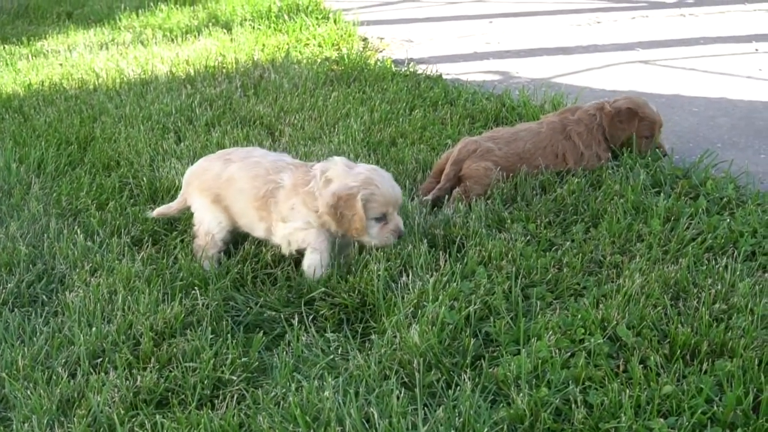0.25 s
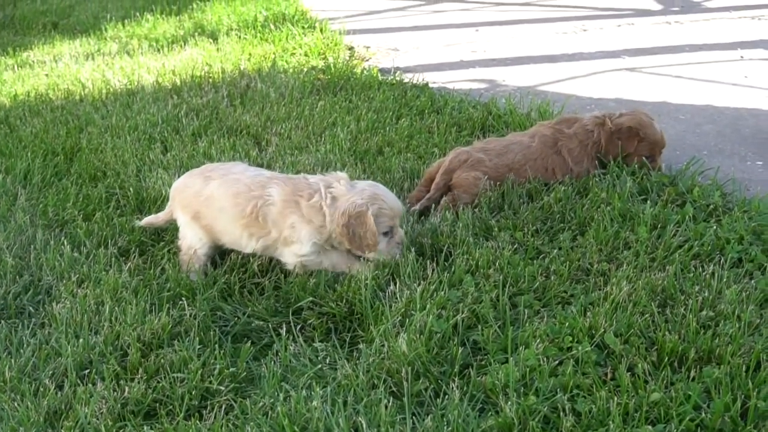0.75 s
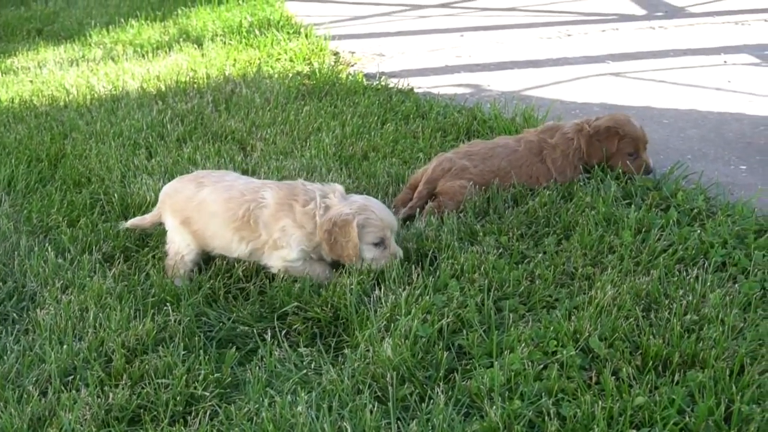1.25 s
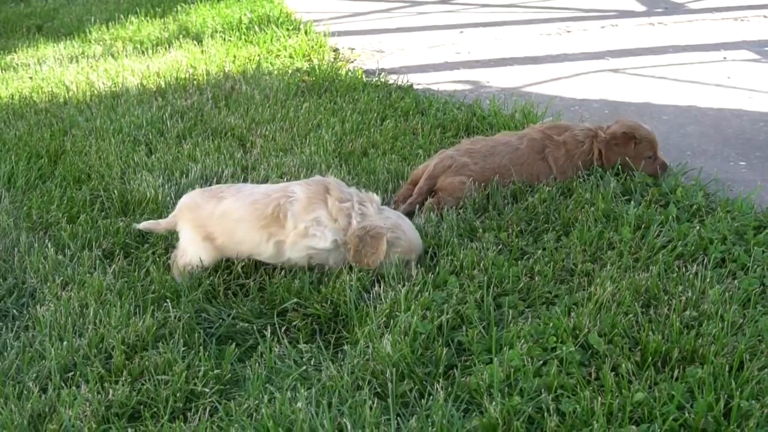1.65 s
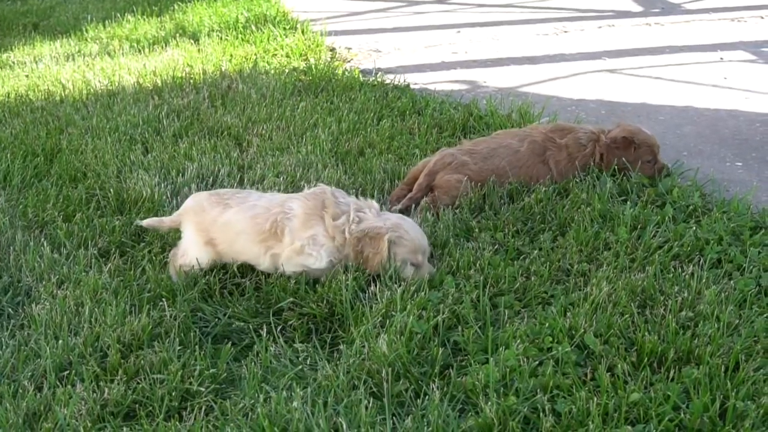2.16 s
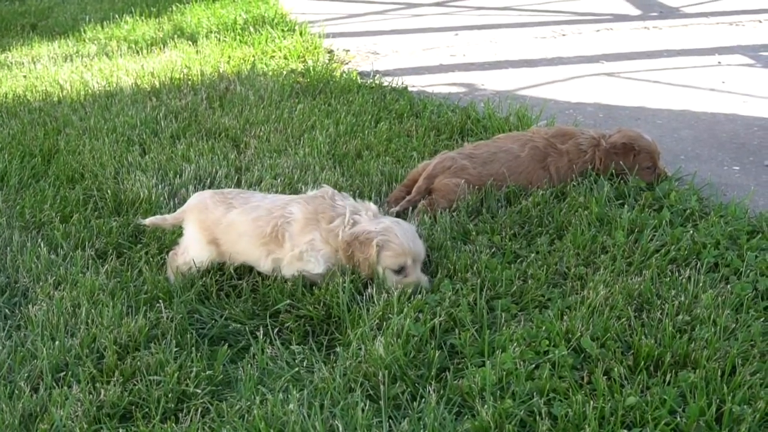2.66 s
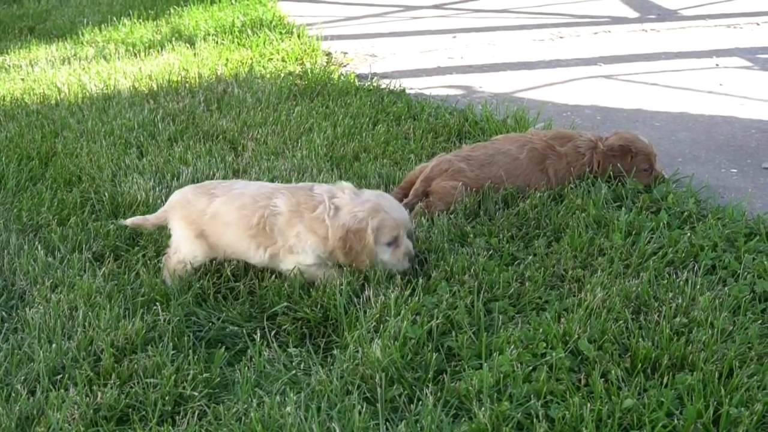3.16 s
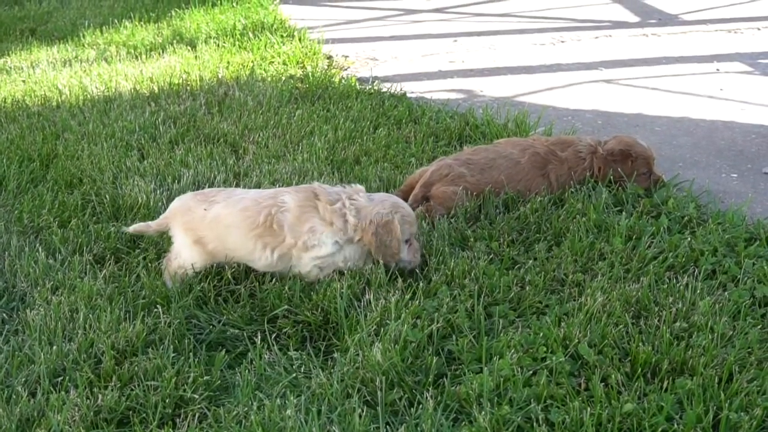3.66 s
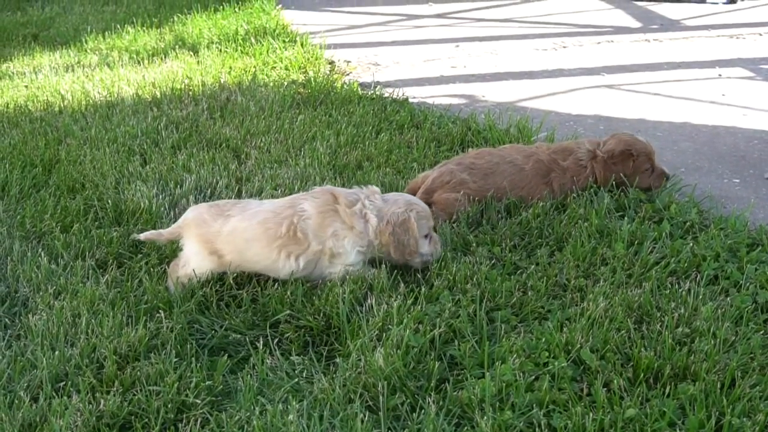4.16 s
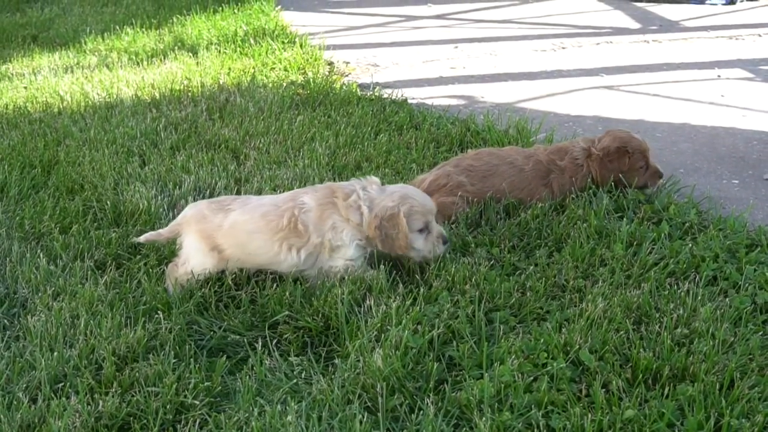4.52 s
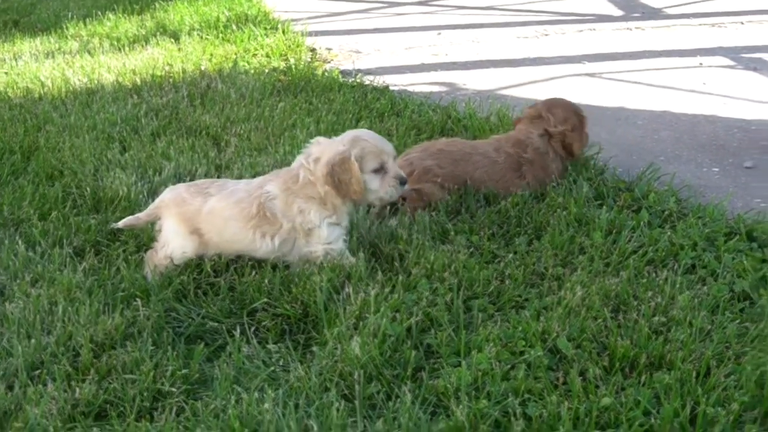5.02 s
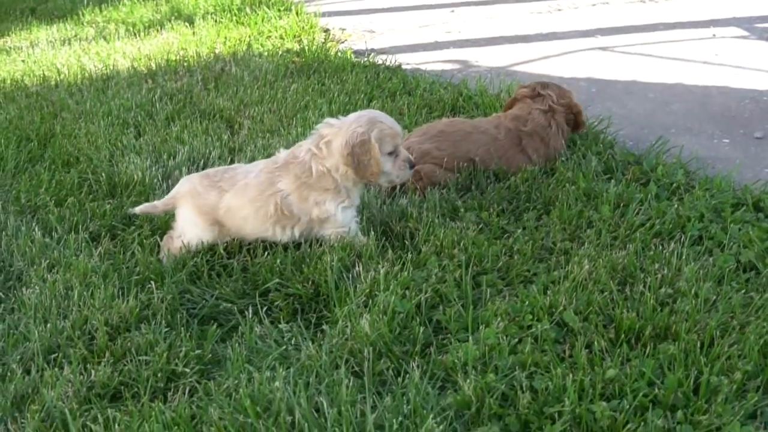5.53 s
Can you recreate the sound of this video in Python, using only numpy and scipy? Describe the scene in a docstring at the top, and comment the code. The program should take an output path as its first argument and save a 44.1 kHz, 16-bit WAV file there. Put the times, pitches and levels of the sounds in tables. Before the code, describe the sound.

A nearby sparrow gives three sharp falling chirps on the left while wind buffets the microphone early on and distant birds twitter.

```python
"""Sparrow in a summer garden

A near sparrow, mostly to the left, gives three two-humped falling chirps: a voice whose pitch and loudness
follow syrinx tension, reflected by ground, walls and foliage. Other birds cheep and whistle further off as
gliding tones. Shaped noise makes the gusts, strongest in the first three seconds, the ticks in the grass
and the faint neighbourhood air and hum. A limiter ducks everything at loud peaks and recovers slowly."""
import sys
import numpy as np
from scipy import signal
from scipy.fft import rfft, irfft
from scipy.io import wavfile
from scipy.ndimage import uniform_filter1d, minimum_filter1d

SR = 44100
rng = np.random.default_rng(int(sys.argv[2]) if len(sys.argv) > 2 else 0)


def store_wav(level_fs):
    """Save 16-bit WAV to argv[1]."""
    pcm = np.round(np.clip(np.atleast_2d(level_fs), -1, 1) * 32767)
    wavfile.write(sys.argv[1], SR, pcm.T.astype(np.int16))


N = 255206
TIME = np.arange(N) / SR
FREQ = np.maximum(np.fft.rfftfreq(N, 1 / SR), 1)


def undb(db):
    """Amplitude ratio: 20 dB is a factor of ten."""
    return 10 ** (np.asarray(db) / 20)


def unit(x):
    """Power normalisation: scale to rms 1."""
    return x / np.sqrt(np.mean(x ** 2))


def follow(table, t):
    """Linear interpolation: the columns of a time curve at times t."""
    s, *columns = np.transpose(table)
    return [np.interp(t, s, c) for c in columns]


def across(points):
    """Logarithmic interpolation: a curve over frequency, joined on a log axis."""
    hz, value = np.transpose(points)
    return np.interp(np.log(FREQ), np.log(np.maximum(hz, 1)), value)


def band(x, lo_hz, hi_hz, order=2):
    """Band-pass filtering: a Butterworth resonance between two edges."""
    edges_hz = [lo_hz, min(hi_hz, .45 * SR)]
    return signal.sosfilt(signal.butter(order, edges_hz, "band", fs=SR, output="sos"), x)


def walk(rate, size=N):
    """Random modulation: held random values, smoothed into a wander."""
    hold = max(int(SR / rate), 1)
    steps = np.repeat(rng.standard_normal(size // hold + 1), hold)
    return uniform_filter1d(steps, hold)[:size]


def add(track, start, sound):
    """Superposition: mix a sound into a track at a time in seconds."""
    i = max(int(start * SR), 0)
    track[..., i:i + sound.shape[-1]] += sound[..., :max(N - i, 0)]


def scatter(x, t60, onset):
    """Diffuse reverberation: leaves, fences and walls return a dense tail, different in each ear."""
    t = np.arange(SR) / SR
    decay = np.exp(-np.log(1000) * t / t60)
    tail = rng.standard_normal((2, SR)) * decay * (1 - np.exp(-t / onset))
    tail /= np.sqrt(np.sum(tail ** 2, axis=1, keepdims=True))
    return signal.fftconvolve(x[None], tail, axes=1)[:, :N]


def echoes(x, walls):
    """Specular reflection: flat surfaces return delayed copies."""
    out = np.zeros((2, N))
    for delay, left_db, right_db in walls:
        add(out, delay, undb([[left_db], [right_db]]) * x)
    return out


# spectrum of the background air: pitch_hz [Hz], relative_level_db [dB]
AIR_SPECTRUM = [(15, -36), (25, 2), (140, -2), (193, -6), (246, -2.5), (389, -11.5), (457, -10.5),
                (567, -16), (848, -17), (2560, -23.5), (4150, -18.5), (5140, -18.5), (6380, -32.5),
                (9050, -38), (15500, -42)]
# stereo width of the air: pitch_hz [Hz], side_minus_mid_db [dB]
AIR_WIDTH = [(60, -28), (110, -34), (200, -31), (380, -13), (700, -7.5), (1290, -5), (2380, -4.5),
             (4400, -8.5), (8120, 0), (15000, -3)]
# distant machine hum: pitch_hz [Hz], width_hz [Hz], level_db [dB]
HUM_LINES = [(143.9, 5.7, -47), (241.1, 9.1, -54.5)]


def neighbourhood(air_db=-53, flicker_db=1.08, dip_hz=4200, dip_db=-3):
    """Coloured noise: distant traffic and leaves, alike in both ears in the bass, over narrow-band hum."""
    dip = dip_db * np.exp(-np.log2(FREQ / dip_hz) ** 2 / 0.3)
    colour = undb(across(AIR_SPECTRUM) + dip)
    mid, side = rfft(rng.standard_normal((2, N))) * colour
    mid, side = irfft(mid, N), irfft(side * undb(across(AIR_WIDTH)), N)
    # air_db is the mean level of the mid signal between 700 and 1800 Hz
    air = (mid + np.array([[1], [-1]]) * side) / np.std(band(mid, 700, 1800, order=4))
    hum = np.zeros(N)
    for hz, width, line_db in HUM_LINES:
        hum += undb(line_db) * unit(band(rng.standard_normal(N), hz - width / 2, hz + width / 2))
    return air * undb(air_db + flicker_db * walk(8)) + hum


# ticks and rustles of the grass: start_s [s], onset_level_db [dB], centre_hz [Hz], decay_s [s]
GRASS_TICKS = [(.887, -31, 2800, .005), (1.36, -45, 1700, .03), (5.292, -45, 1820, .027),
               (5.312, -39, 9135, .01), (5.316, -39, 1700, .012)]


def grass():
    """Impulsive excitation: dry blades and twigs give band-limited noise that dies exponentially."""
    out = np.zeros((2, N))
    for start, db, hz, decay in GRASS_TICKS:
        t = np.arange(int(4 * decay * SR)) / SR
        # one part common to both ears, one part separate
        noise = rng.standard_normal(len(t)) + 0.67 * rng.standard_normal((2, len(t)))
        tick = unit(band(noise, hz / 1.36, hz * 1.35))
        add(out, start, undb(db) * tick * np.exp(-t / decay))
    return out


# breeze between gusts: time_s [s], relative_level_db [dB]
BREEZE = [(0, -33), (.55, -35), (1.1, -37.5), (1.35, -28.5), (1.8, -28), (2.7, -33), (3.2, -50.5),
          (5.0, -48.5), (5.79, -34.5)]
# bell-shaped gusts: peak_s [s], length_s between the 1/e points of power [s], relative_level_db [dB]
GUSTS = [(0.102, 0.057, -22.5), (0.228, 0.13, -20), (0.695, 0.044, -27), (0.788, 0.021, -26.5),
         (0.956, 0.13, -30), (1.183, 0.038, -24.5), (1.253, 0.024, -28.5), (1.415, 0.07, -19),
         (1.478, 0.073, -13.5), (1.612, 0.063, -14.5), (1.724, 0.058, -15.5), (1.891, 0.049, -13.5),
         (2.017, 0.085, -16), (2.24, 0.054, -19), (2.304, 0.049, -22.5), (2.379, 0.049, -17.5),
         (2.468, .045, -23), (2.55, .06, -24), (2.847, 0.03, -20), (2.914, 0.072, -18.5),
         (3.049, .04, -35.5), (4.05, 0.026, -30), (4.514, 0.045, -32.5), (5.595, .1, -26)]


def wind_level():
    """Power addition: level in dB of the flow at the microphone, gusts on top of the breeze."""
    breeze_db, = follow(BREEZE, TIME)
    gust_power = np.zeros(N)
    for peak, length, db in GUSTS:
        bell = np.exp(-np.minimum((2 * (TIME - peak) / length) ** 2, 20))
        gust_power += undb(db) ** 2 * bell
    return 10 * np.log10(undb(breeze_db) ** 2 + gust_power)


# spectrum of the wind noise: pitch_hz [Hz], relative_level_db [dB]
WIND_SPECTRUM = [(12, -43), (20, -19), (59, 0), (113, 1), (143, -2.5), (173, -9), (232, -6.5), (332, -13),
                 (387, -25), (444, -19.5), (648, -39), (1200, -68), (1560, -77), (2640, -120)]
# phase between the ports: pitch_hz [Hz], left_lead_rad [rad]
WIND_PHASE = [(30, .1), (55, .3), (100, .65), (165, 1.05), (250, 1.45), (400, 1.8), (650, 1.9)]
# sharp buffets: start_s [s], relative_level_db [dB], nominal_pitch_hz [Hz], nominal_length_s [s]
BUFFETS = [(.055, -29, 296.6, 0.026), (.970, -22.5, 251, 0.0157), (1.162, -21, 269, .02),
           (1.43, -14, 307, .044), (1.675, -2.5, 258.4, 0.011), (1.714, -13.5, 240, .017),
           (1.901, -10.5, 298, .0115), (2.033, -17.5, 266, 0.031), (2.365, -19, 262, 0.02),
           (2.874, -10.5, 233, 0.024)]
STRONG_DB, REACH = -15, 0.45  # above this wind level [dB] the upper band gains REACH dB more per dB


def wind(gust_db=0.5, upper_db=-12.0, calm_db=-43, apart_db=-12, split_hz=250, buffet_db=-6):
    """Turbulent pressure: eddies buffet the microphone ports; stronger gusts reach higher in frequency."""
    db = wind_level()
    upper_rel_db = REACH * (db - STRONG_DB)
    colour = undb(across(WIND_SPECTRUM))
    upper_share = 1 / (1 + (split_hz / FREQ) ** 6)
    bands = [(1 - upper_share, db + gust_db), (upper_share, db + upper_rel_db + upper_db)]
    pressure = np.zeros(N)
    for share, band_db in bands:
        eddies = irfft(rfft(rng.standard_normal(N)) * colour * share, N)
        # the flow is even within a gust: its strength comes from the gust alone
        eddies /= np.sqrt(uniform_filter1d(eddies ** 2, int(0.0573 * SR)))
        pressure += eddies * undb(band_db)
    # a flow weaker than calm_db is softened further
    pressure /= np.sqrt(1 + undb(calm_db - db) ** 2)
    for start, peak_db, hz, length in BUFFETS:
        size = int(1.6 * length * SR)
        eddy = band(rng.standard_normal(SR // 4), hz / 1.62, hz * 1.05)[-size:]
        eddy = unit(eddy * signal.windows.tukey(size, .6))
        add(pressure, start, undb(peak_db + buffet_db) * eddy)
    # the two ports feel the same eddy out of step, plus a little of their own
    turn = np.exp(np.array([[.5j], [-.5j]]) * across(WIND_PHASE))
    own = unit(irfft(rfft(rng.standard_normal((2, N))) * colour, N))
    return irfft(rfft(pressure) * turn, N) + own * undb(db + apart_db)


# resonances of a distant bird's open beak: centre_hz [Hz], width_hz [Hz], relative_level_db [dB]
BEAK = [(9310, 540, -1.5), (13510, 1900, -10)]


def cheep(length, first_hz, last_hz, octave_db, bend=3.2, waver=0.02534, hoarse=0.085, buzz_hz=170,
          overtone_db=-2):
    """Frequency modulation: a glide that levels off; a harsh one buzzes in pitch and hisses in the beak."""
    u = np.linspace(0, 1, int(length * SR))
    size = len(u)
    fall = (np.exp(-bend * u) - np.exp(-bend)) / (1 - np.exp(-bend))
    buzz_rate = buzz_hz * (1 + 0.282 * walk(79.96, size))
    buzz = np.sin(2 * np.pi * np.cumsum(buzz_rate) / SR) + 0.556 * walk(1200, size)
    wobble = waver * walk(109.98, size) + hoarse * undb(octave_db / 2) * buzz
    hz = (last_hz + (first_hz - last_hz) * fall) * (1 + wobble)
    phase = 2 * np.pi * np.cumsum(hz) / SR
    hiss = np.zeros(size)
    for centre, width, db in BEAK:
        noise = band(rng.standard_normal(size), centre - width / 2, centre + width / 2)
        hiss += undb(db - 5.5) * unit(noise)
    tone = np.sin(phase) + undb(octave_db) * (undb(overtone_db) * np.sin(2 * phase) + hiss)
    swell = signal.windows.tukey(size, .3)
    return np.sqrt(2) * swell * undb(1.1 * walk(64.0, size)) * tone


def flock(low_hz=3000, high_hz=5400, count=200):
    """Superposed sources: many faint short cheeps, spread over time, merge into diffuse twitter."""
    voice = np.zeros(N)
    for k, (when, pitch, size, span) in enumerate(rng.random((count, 4))):
        hz = low_hz + (high_hz - low_hz) * np.sqrt(pitch)
        call = cheep(0.02069 + 0.0405 * span, hz, 0.67 * hz, -48)
        start = (k + when) / count * N / SR - .1
        add(voice, start, undb(-50 + 4 * size) * call)
    return scatter(voice, t60=0.25, onset=0.0034)


# harsh cheeps of distant sparrows:
# start_s [s], length_s [s], last_pitch_hz [Hz], source_level_db [dB], relative_overtone_and_hiss_db [dB]
CHEEPS = [(1.020, .13, 4220, -38.5, -8), (1.303, 0.11, 4360, -33, -14), (1.748, 0.22, 4126, -33.5, -13.5),
          (2.059, .15, 4430, -35, -11.5), (2.173, 0.178, 4136, -41.5, -12.5),
          (2.593, 0.18, 4220, -37, -11.5), (2.764, 0.096, 4180, -39, -12.5), (2.942, .22, 4163, -41, -12.5),
          (3.443, 0.12, 4350, -37.5, -20), (3.742, .22, 4010, -39.5, -15.5), (4.652, 0.15, 4276, -40, -16),
          (5.008, 0.2, 4350, -39.5, -16), (5.435, 0.2, 4080, -43, -16.5), (5.692, .1, 4300, -47.5, -8)]
# short clear notes of other distant birds:
# start_s [s], length_s [s], first_pitch_hz [Hz], last_pitch_hz [Hz], source_level_db [dB]
NOTES = [(0.049, 0.18, 4300, 2980, -46.5), (0.718, .05, 2680, 2300, -44), (0.953, 0.078, 3500, 2726, -42),
         (1.153, 0.056, 3800, 2870, -40), (2.328, 0.042, 3400, 2747, -41.5),
         (2.376, 0.056, 6040, 4600, -40), (2.587, 0.056, 3400, 2950, -38), (2.795, 0.049, 5200, 3460, -35),
         (3.173, .045, 5870, 4870, -38), (3.808, 0.12, 5310, 4950, -42.5), (4.043, .06, 3420, 2820, -39),
         (4.044, 0.098, 4420, 4040, -41), (4.205, .04, 3750, 3400, -42), (4.231, 0.076, 6400, 5980, -50),
         (4.231, 0.046, 3150, 3000, -40), (4.335, 0.098, 5200, 4930, -42), (4.529, 0.17, 2600, 2420, -50.5),
         (4.657, .04, 5920, 4970, -38.5), (5.22, 0.053, 5670, 5130, -44.5), (5.277, .11, 4020, 2910, -43.5),
         (5.394, .06, 6200, 5420, -47), (5.55, 0.056, 3300, 2850, -42), (5.613, 0.064, 3200, 3700, -43),
         (5.659, 0.087, 5860, 6260, -46.5)]
CHEEP_FALL = 1.26  # a cheep starts this many times higher than it ends


def far_birds(direct_db=-5, wet_db=0.5, note_octave_db=-26, note_direct_db=-7, note_wet_db=-2, fade_db=1.0):
    """Direct and diffuse fields: falling cheeps come mostly by way of trees and walls, notes less so."""
    cheeps, notes = np.zeros((2, N))
    for start, length, last_hz, db, octave_db in CHEEPS:
        call = cheep(length, CHEEP_FALL * last_hz, last_hz, octave_db)
        fading_db = db + fade_db * np.linspace(.5, -.5, len(call))
        add(cheeps, start, undb(fading_db) * call)
    for start, length, first_hz, last_hz, db in NOTES:
        note = cheep(length, first_hz, last_hz, note_octave_db, bend=0.73, waver=0.0151)
        add(notes, start, undb(db) * note)
    cheeps_heard = undb(direct_db) * cheeps + undb(wet_db) * scatter(cheeps, t60=0.84, onset=0.0013)
    notes_heard = undb(note_direct_db) * notes + undb(note_wet_db) * scatter(notes, t60=0.37, onset=0.0019)
    return cheeps_heard + notes_heard


# thin whistle, briefly rising and then falling: time_s [s], pitch_hz [Hz], source_level_db [dB]
WHISTLE = [(.48, 7710, -52), (.505, 8490, -41), (.525, 8500, -40), (.55, 7780, -33), (.575, 6720, -37.5),
           (.60, 5930, -38), (.63, 5407, -42), (.69, 5080, -56)]
# its echoes: delay_s [s], left_db [dB], right_db [dB], relative to the source
WHISTLE_ECHOES = [(0.08, -20, -11), (0.155, -25, -10.5)]


def whistler(octave_db=-23, direct_db=-6.5, wet_db=1):
    """Phase integration: a thin, very high whistle glides, and comes back twice and as a diffuse tail."""
    hz, db = follow(WHISTLE, TIME)
    phase = 2 * np.pi * np.cumsum(hz * (1 + 0.009 * walk(400))) / SR
    sounding = (TIME > WHISTLE[0][0]) & (TIME < WHISTLE[-1][0])
    tone = np.sin(phase) + undb(octave_db) * np.sin(2 * phase)
    voice = np.sqrt(2) * sounding * undb(db) * tone
    tail = undb(wet_db) * scatter(voice, t60=0.52, onset=0.0036)
    return undb(direct_db) * voice + echoes(voice, WHISTLE_ECHOES) + tail


# the two arches of syrinx tension in a near chirp, before each chirp's own pitch and rise ratios:
# after_first_crest_s [s], crest_pitch_hz [Hz], rise_s [s], fall_s [s], relative_level_db [dB]
ARCHES = [(0, 4730, .017, .034, 0), (.060, 3880, .019, .019, -2)]
REST_HZ = 2000  # slack pitch, before the pitch ratio
LEAD_S, END_S = .06, .1  # the call runs from LEAD_S before the first crest to END_S after
FADE_IN_S, FADE_OUT_S = .02, .008  # the call creeps in and stops quickly
# the rasp locks into a clear tone about LOCK_S (times the rise ratio) before the crest, this fast
LOCK_S, LOCK_SPREAD_S = .0135, .0012
PAUSE_S, PAUSE_LENGTH_S = .041, .0055  # the voice nearly stops between the arches
# level at slack pitch; of the fundamental while raspy; in the pause
SLACK_DB, UNLOCKED_DB, PAUSE_DB = -28.5, -21, -19
# roughness 0-1 added in the lead-in and always present; overtones of the arches
RASP, CLEAR_RASP, CLEAR_OVERTONES_DB = .45, 0.024, -33


def chirp(pitch, rise, lift_hz, lead_db, third_db=-13, fourth_db=-19, edge_db=-34, hiss_db=-18,
          breathy_db=-36, burr_hz=620, burr=1.0):
    """Source tension: syrinx tension peaks twice, carrying pitch and loudness; overtones lead in raspily."""
    t = np.arange(-LEAD_S, END_S, 1 / SR)
    size = len(t)
    arches = []
    for at, _, up, down, _ in ARCHES:
        up_s = up * (rise if at == 0 else 1)
        side_s = np.where(t < at, up_s, down)
        arches.append((1 + ((t - at) / side_s) ** 2) ** -1.5)
    arches = np.array(arches)
    _, crest_hz, _, _, arch_db = np.transpose(ARCHES)
    lifts = arches * (crest_hz[:, None] - REST_HZ)
    tension = arches.max(axis=0)
    raspy = .5 - .5 * np.tanh((t + LOCK_S * rise) / (2 * LOCK_SPREAD_S))
    rasp = np.clip(CLEAR_RASP + RASP * raspy * (1 - (2 * tension) ** 2).clip(0), 0, 1)

    crest_lift_hz = lift_hz * np.exp(-(t / 0.0054) ** 2)
    hz = pitch * (REST_HZ + lifts.max(axis=0)) + crest_lift_hz
    hz = hz * (1 + 0.02 * walk(252, size))
    phase = 2 * np.pi * np.cumsum(hz * (1 + 0.041 * rasp * walk(900, size))) / SR
    # the two sides of the syrinx beat against each other until the tone locks in
    burr_rate = burr_hz * (1 + 0.213 * walk(300, size))
    phase += burr * rasp * np.sin(2 * np.pi * np.cumsum(burr_rate) / SR)

    overtones = np.sin(2 * phase) + undb(third_db) * np.sin(3 * phase) + undb(fourth_db) * np.sin(4 * phase)
    hiss = unit(band(rng.standard_normal(size), 8600, 13700, order=1))
    fundamental = np.sin(phase) + undb(edge_db) * np.sin(3 * phase) + undb(breathy_db) * hiss
    overtones_db = lead_db * raspy + CLEAR_OVERTONES_DB * (1 - raspy)
    tone = undb(UNLOCKED_DB * raspy) * fundamental
    tone += undb(overtones_db) * (overtones + undb(hiss_db) * hiss)

    pause_db = PAUSE_DB * np.exp(-((t - PAUSE_S) / PAUSE_LENGTH_S) ** 2)
    db = arch_db[lifts.argmax(axis=0)] + SLACK_DB * (1 - tension) ** 2 + pause_db
    flutter_db = (1.53 + 0.87 * rasp) * walk(360.7, size)
    fade_points = [-LEAD_S, FADE_IN_S - LEAD_S, END_S - FADE_OUT_S, END_S]
    fade = np.interp(t, fade_points, [0, 1, 1, 0]) ** 2
    return np.sqrt(2) * undb(db + flutter_db) * fade * tone


# near chirps: crest_s [s], source_level_db [dB], pitch_ratio [1], rise_time_ratio [1],
# crest_lift_hz [Hz], lead_in_overtones_db [dB]
CHIRPS = [(.2890, -8.5, 0.98, .97, 374.5, 4.5), (3.3222, -10.5, 0.96, 1.03, 93, 6),
          (4.8523, -9.5, 0.97, 1.2, -2, 2)]
# nearest surfaces, whose reflections beat against the glides: delay_s [s], left_db [dB], right_db [dB]
GROUND = [(.0013, -12, -19), (.0026, -9, -18)]
# house walls, relative to the dulled voice: delay_s [s], left_db [dB], right_db [dB]
WALLS = [(.0165, -17, -13), (.0640, -20, -22)]


def near_sparrow(right_db=-15, dull_hz=4500, leaves_db=-11, yard_db=-24, top_hz=7000, top_db=-6):
    """Multipath propagation: chirps come straight from the left, then off ground, walls and foliage."""
    voice = np.zeros(N)
    for crest, db, pitch, rise, lift_hz, lead_db in CHIRPS:
        add(voice, crest - LEAD_S, undb(db) * chirp(pitch, rise, lift_hz, lead_db))
    # the throat swallows the octave of the highest notes
    voice -= 0.8 * band(voice, 7300, 10160, order=1)
    # the highest overtones reach both ports
    top = irfft(rfft(voice) / (1 + (top_hz / FREQ) ** 12), N)
    direct = undb([[0], [right_db]]) * (voice - top) + undb(top_db) * top + echoes(voice, GROUND)
    # foliage absorbs the top of what it scatters
    dull = irfft(rfft(voice) * (1.19 + 0.22 / (1 + (FREQ / dull_hz) ** 8)), N)
    leaves = undb(leaves_db) * scatter(dull, t60=0.22, onset=0.0029)
    yard = undb(yard_db) * scatter(dull, t60=0.6, onset=0.093)
    return direct + echoes(dull, WALLS) + leaves + yard


def scene():
    """Linear superposition: the quiet garden, wind and birds add at the two ears."""
    return neighbourhood() + grass() + wind() + flock() + far_birds() + whistler() + near_sparrow()


CEILING, RECOVER_DB_PER_S = 0.58, 7  # peak amplitude where limiting starts, and how fast it lets go
BASS_SENSE_DB = -7.5  # extra share of the rumble that the limiter senses
TOP_HZ = 15750  # upper edge of the treble


def record(dry):
    """Peak limiting: gain ducks at loud peaks, rumble most, and recovers slowly; then the top is cut."""
    ahead = int(.004 * SR)
    rumble = irfft(rfft(dry) / (1 + (FREQ / 250) ** 4), N)
    peak = np.abs(dry + undb(BASS_SENSE_DB) * rumble).max(axis=0)
    over_db = 20 * np.log10(np.maximum(peak / CEILING, 1))
    # a running maximum on a rising ramp holds each cut and releases it at a steady rate
    ramp_db = RECOVER_DB_PER_S * TIME
    cut_db = np.maximum.accumulate(over_db + ramp_db) - ramp_db
    gain = uniform_filter1d(minimum_filter1d(undb(-cut_db), ahead), ahead)
    treble_cut = signal.ellip(10, .2, 80, TOP_HZ, fs=SR, output="sos")
    return signal.sosfilt(treble_cut, dry * gain)


dry = scene()
out = record(dry)
store_wav(out)
```